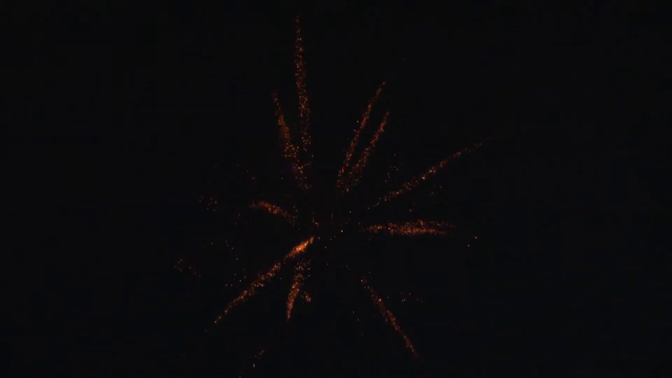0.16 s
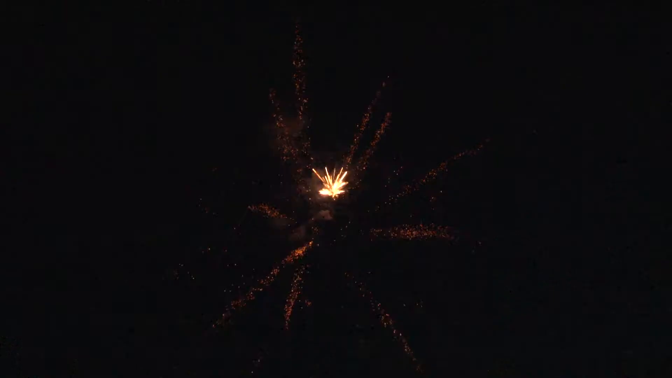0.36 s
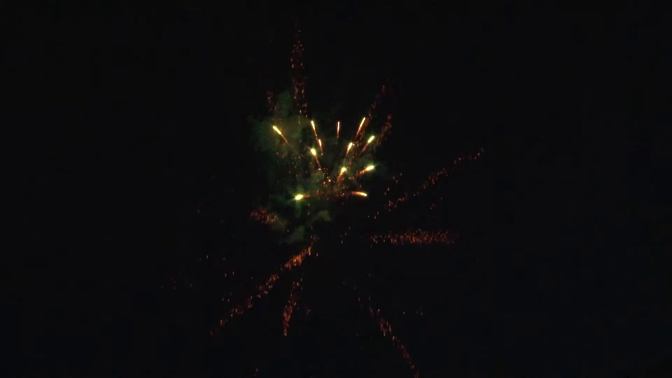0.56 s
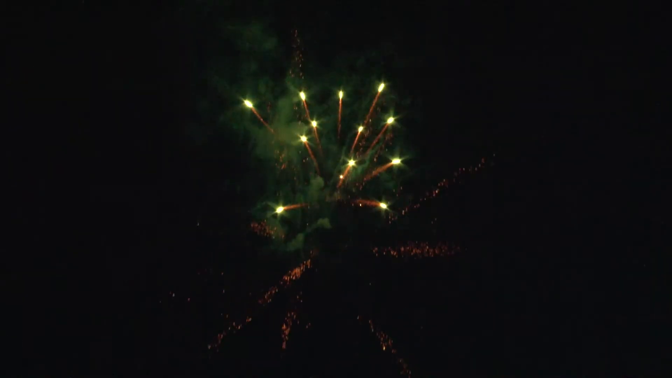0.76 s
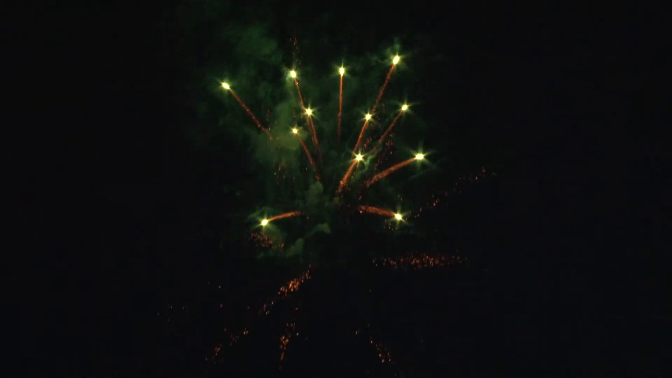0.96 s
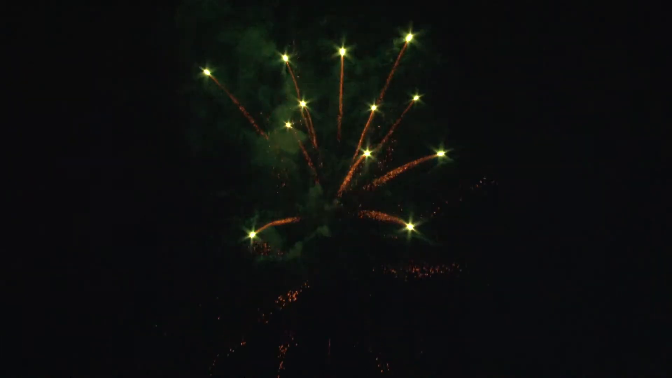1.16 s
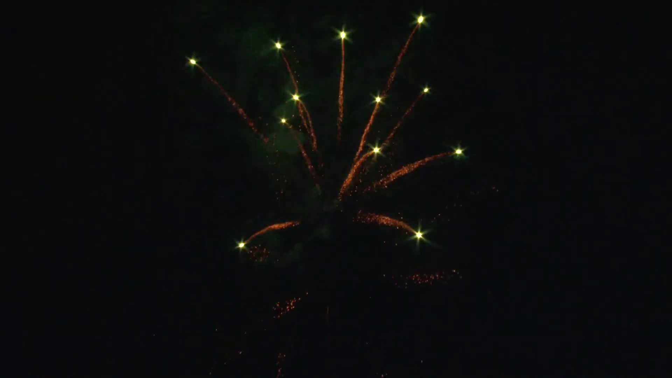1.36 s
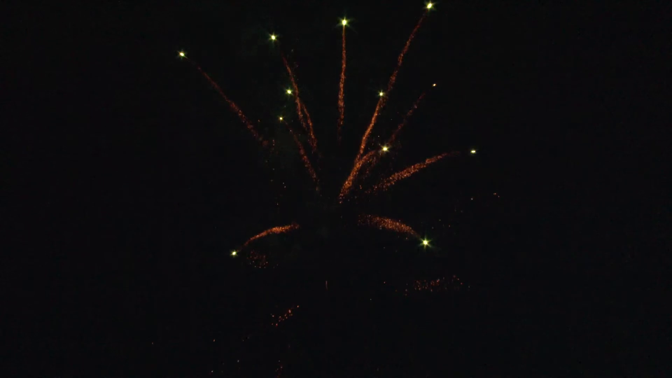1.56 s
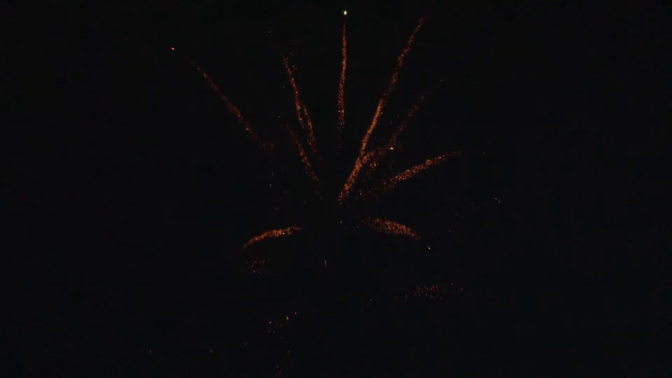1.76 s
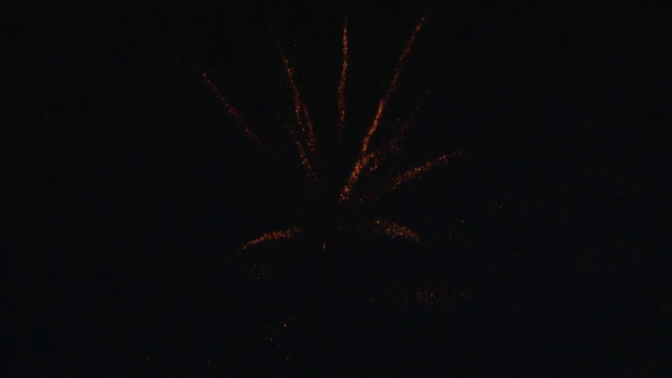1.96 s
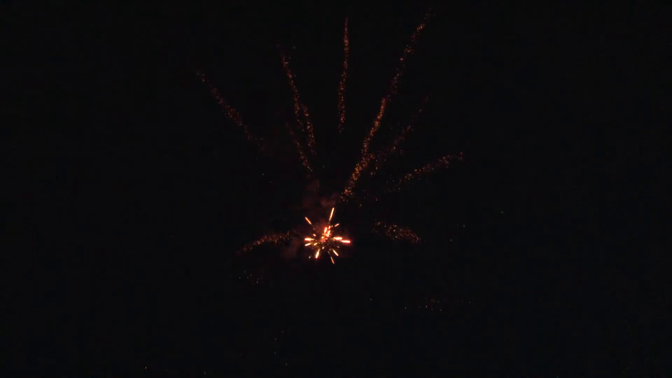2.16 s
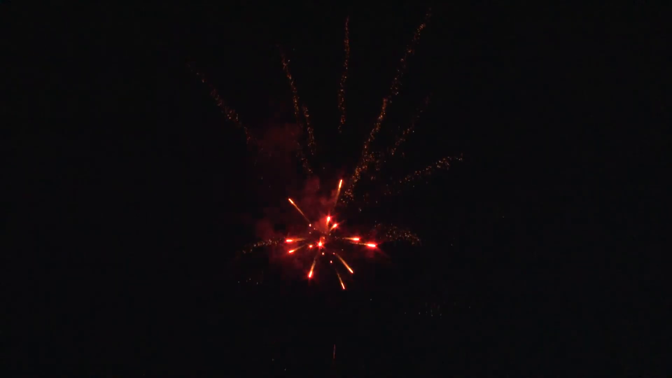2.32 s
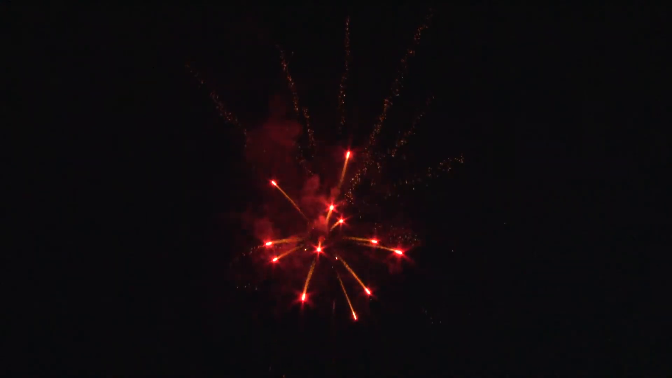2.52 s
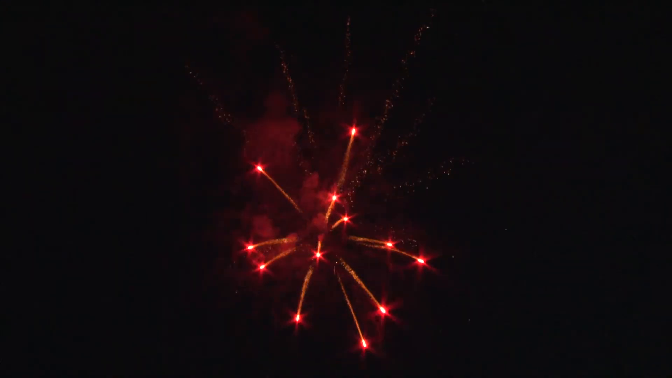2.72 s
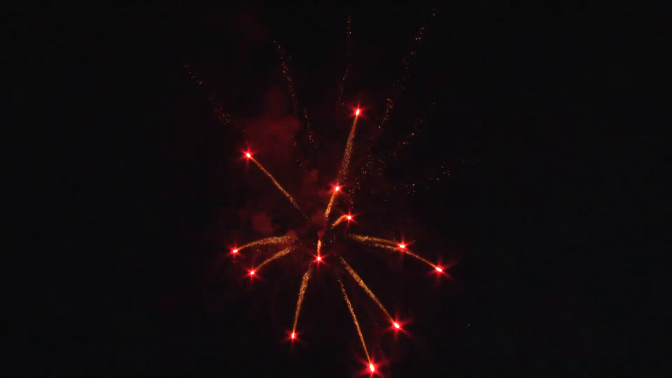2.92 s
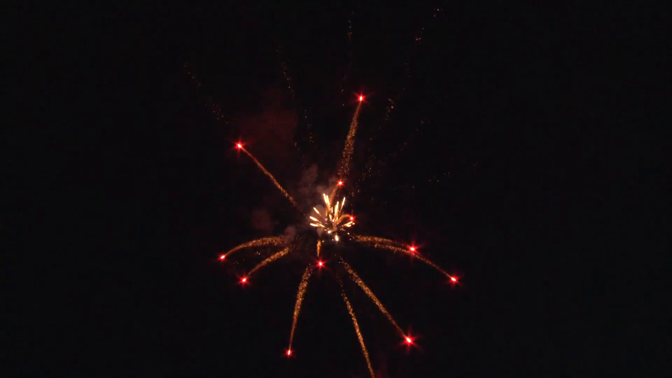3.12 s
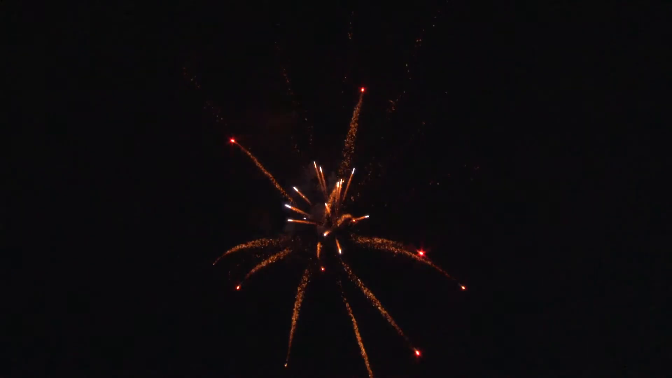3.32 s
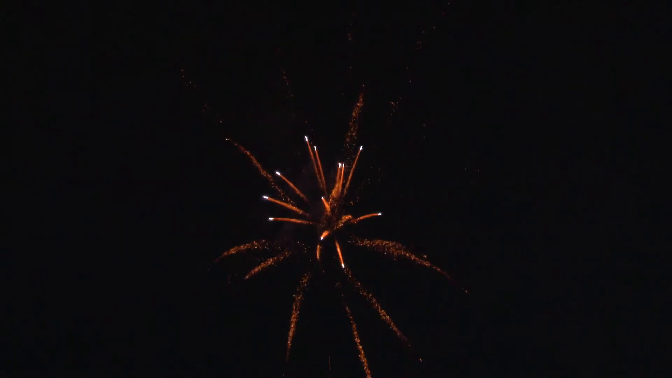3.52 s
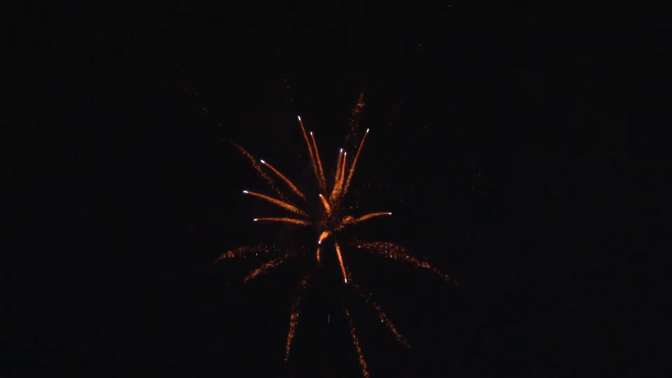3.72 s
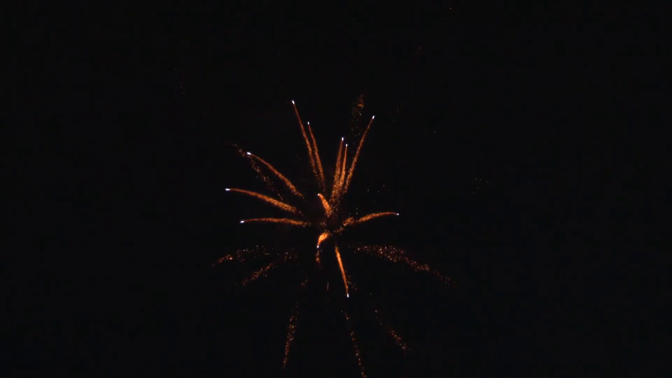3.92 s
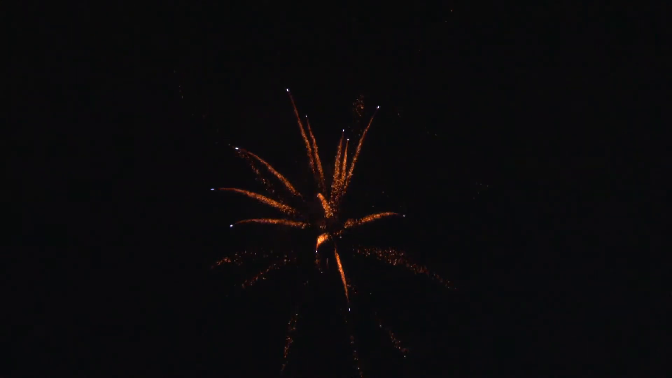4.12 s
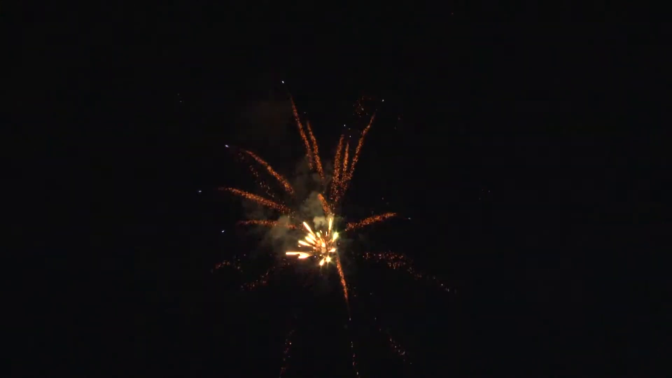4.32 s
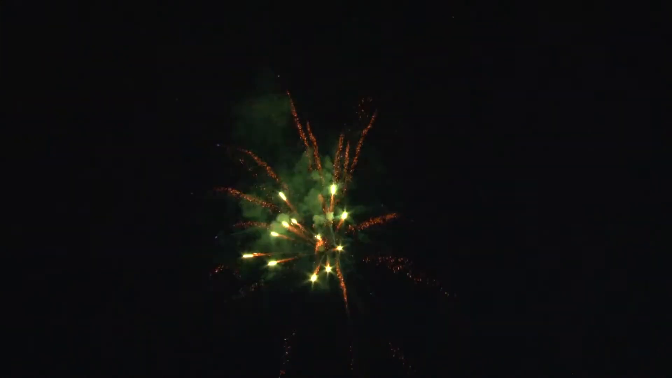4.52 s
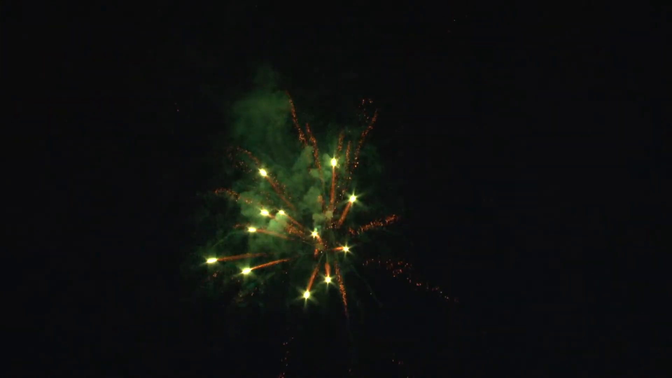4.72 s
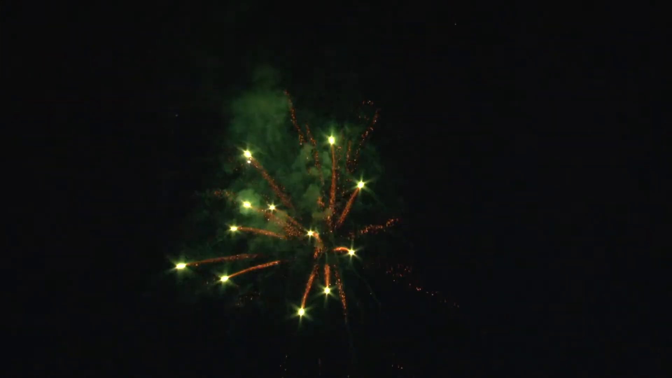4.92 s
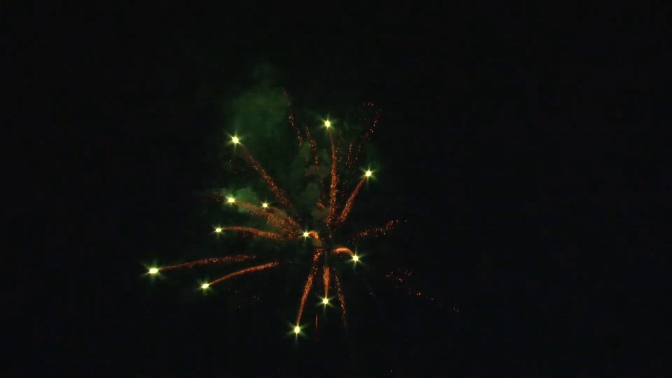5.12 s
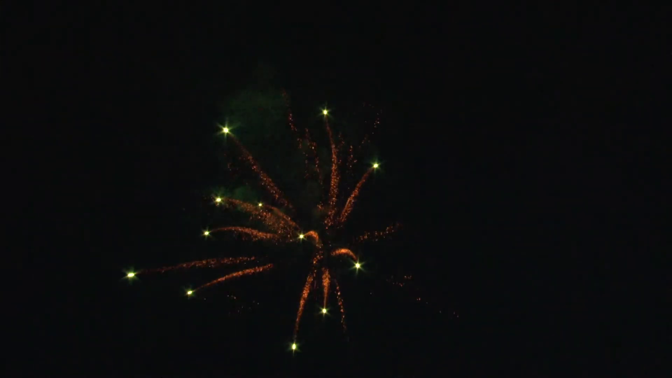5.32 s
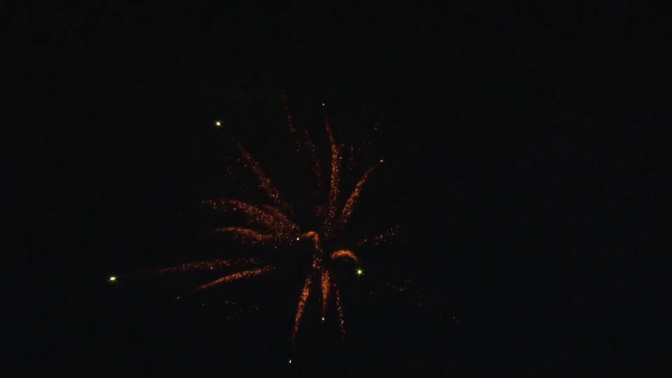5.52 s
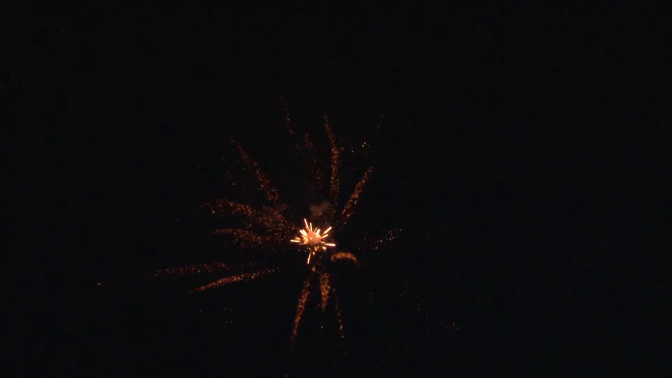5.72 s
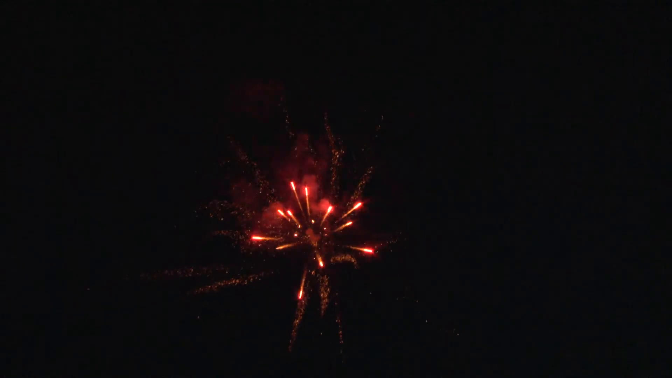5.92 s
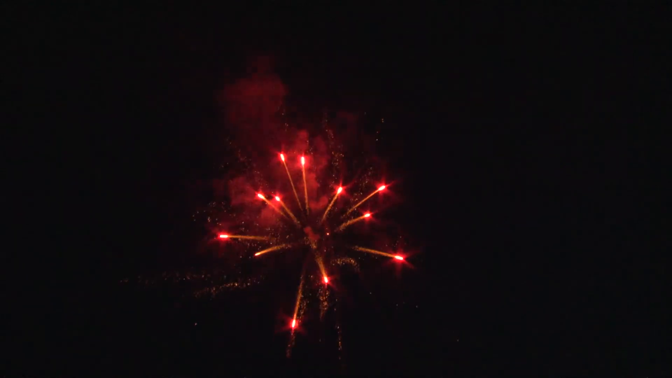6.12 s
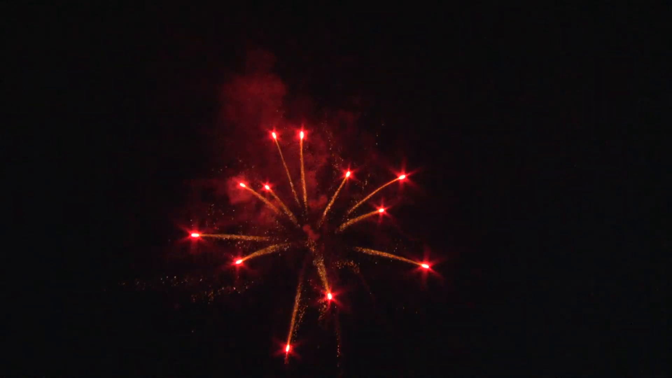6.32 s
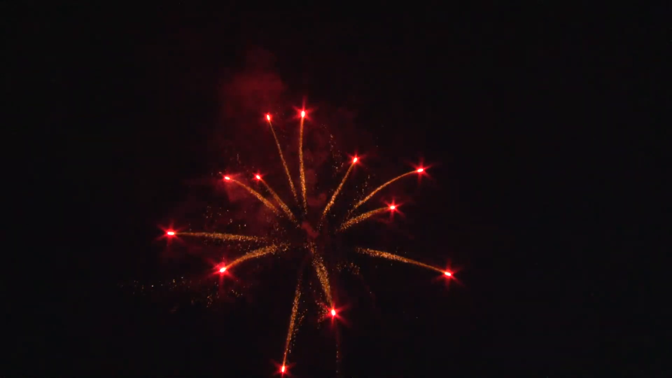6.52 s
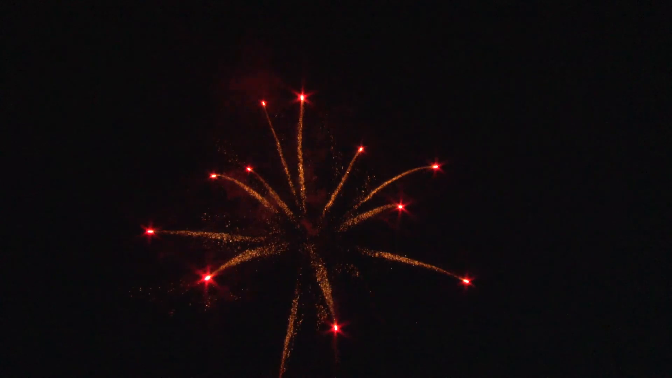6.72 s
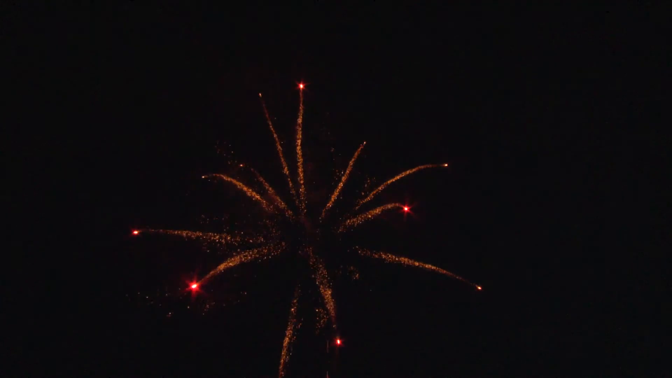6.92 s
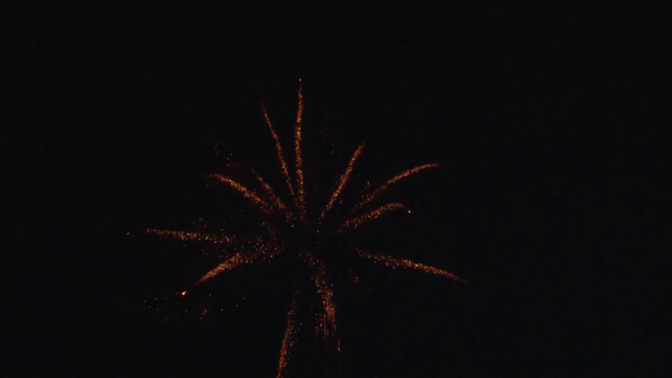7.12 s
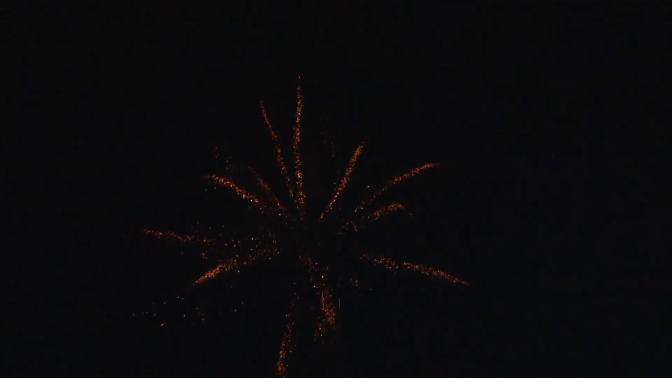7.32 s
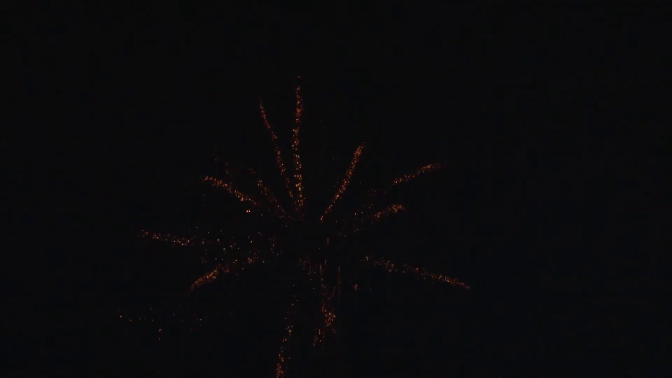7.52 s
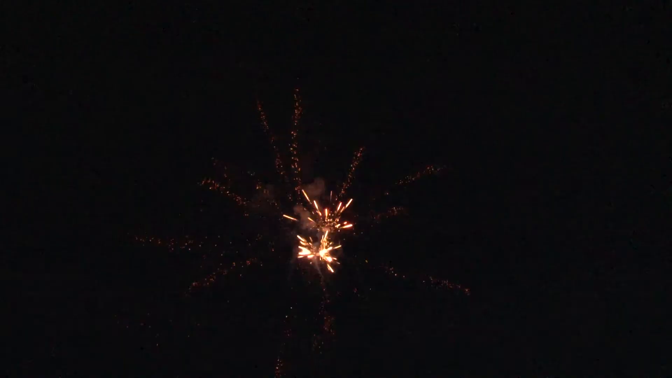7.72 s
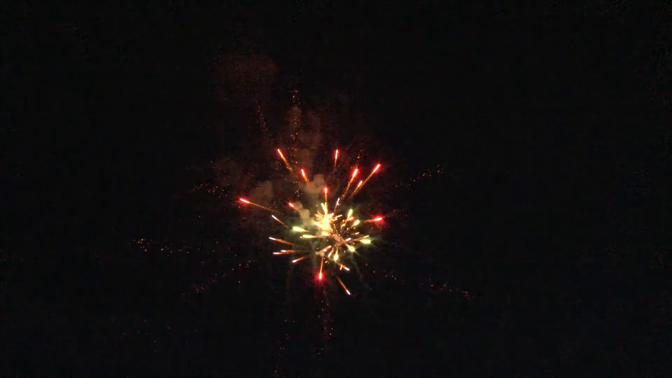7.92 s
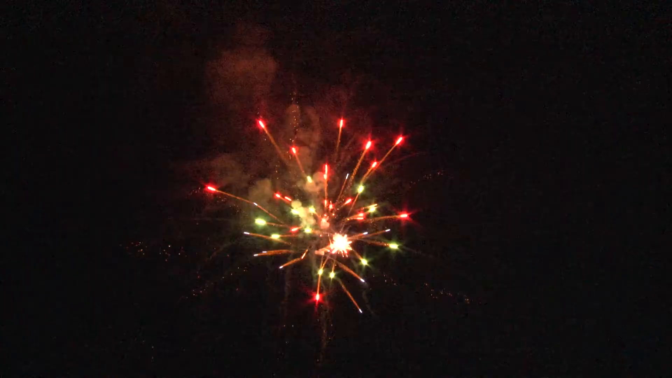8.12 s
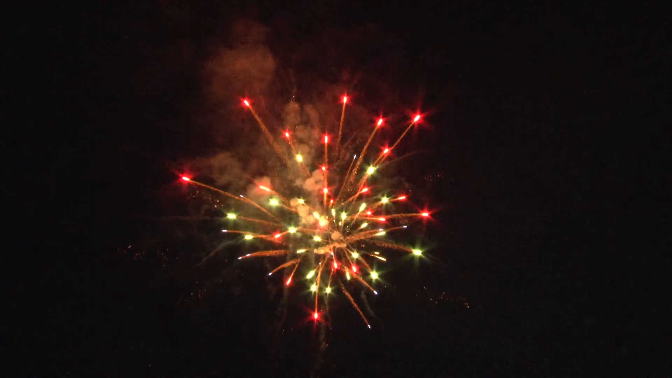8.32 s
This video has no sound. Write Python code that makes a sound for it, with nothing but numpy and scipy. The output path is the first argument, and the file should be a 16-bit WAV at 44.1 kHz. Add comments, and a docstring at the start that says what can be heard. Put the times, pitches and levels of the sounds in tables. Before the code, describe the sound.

Sharp firework bangs go off about a second apart outdoors, each rolling away, then a quick volley of pops leads to a rapid cluster.

```python
"""A faint outdoor hush at night, with the last of a firework's echo rolling away. Heard from a yard,
on a camera microphone: a cake's mortar tubes thump, and the shells burst overhead with hard bangs
that overload it. Each bang comes back off the ground, off a house wall and then as a long roll
from trees and roofs. The stars sizzle as they burn, and small sharp ticks, like falling shell
scraps, sound in between."""
import sys
import numpy as np
from scipy import signal
from scipy.fft import rfft, irfft, next_fast_len
from scipy.io import wavfile
from scipy.ndimage import uniform_filter1d, minimum_filter1d

SR = 44100
rng = np.random.default_rng(int(sys.argv[2]) if len(sys.argv) > 2 else 0)


def to_wav(sig):
    """Store sig (one row per channel, or 1-D mono) as 16-bit WAV at the path in sys.argv[1].

    Samples outside -1..1 are clipped; the rate is SR.
    """
    pcm = np.clip(np.atleast_2d(sig), -1, 1) * 32767
    pcm = np.round(pcm).astype(np.int16)
    wavfile.write(sys.argv[1], SR, pcm.T)  # frames by channels


N = 373086
SHORT, LONG = SR // 5, 2 * SR  # samples in a near sound and in a distant roll


def amp(db):
    """Decibels to gain."""
    return 10 ** (np.asarray(db) / 20)


def unit(x):
    """Scale to rms 1."""
    return x / np.sqrt(np.mean(x ** 2) + 1e-20)


def along(points, hz):
    """Read (Hz, value) points on a log frequency axis."""
    point_hz, values = np.transpose(points)
    return np.interp(np.log(hz + 1), np.log(point_hz + 1), values)


def add(track, s, sound):
    """Mix a sound into a track from time s, which may lie before the start."""
    start = round(s * SR)
    sound = sound[..., max(-start, 0):]
    part = track[..., max(start, 0):][..., :sound.shape[-1]]
    part += sound[..., :part.shape[-1]]


def colour(x, spectrum):
    """Minimum-phase filter through (Hz, dB) points: nothing rings ahead of an attack."""
    size = 2 * next_fast_len(x.shape[-1] // 2 + SR // 20)
    gain = amp(along(spectrum, np.fft.rfftfreq(size, 1 / SR)))
    cepstrum = irfft(np.log(gain + 1e-6))
    cepstrum[1:size // 2] *= 2
    cepstrum[size // 2 + 1:] = 0
    return irfft(rfft(x, size) * np.exp(rfft(cepstrum)), size)[..., :x.shape[-1]]


# Stereo width: the microphone's close ports hear the bass alike.
# Each row: frequency in Hz, side level in dB.
STEREO_WIDTH = [(120, -12.5), (300, -3.5), (1000, 0.5), (2500, -1), (5000, 5), (9000, -10.5)]

def noise(spectrum, size, side_db, grain_db=0):
    """Stereo noise of rms 1; grain lets single spikes stand out."""
    hz = np.fft.rfftfreq(size, 1 / SR)
    white = rng.standard_normal((2, size)) * amp(grain_db * rng.standard_normal(size))
    mid_gain = amp(along(spectrum, hz))
    side_gain = mid_gain * amp(side_db + along(STEREO_WIDTH, hz))
    mid, side = irfft(rfft(white) * [mid_gain, side_gain], size)
    return unit(np.array([mid + side, mid - side]))


def scatter(spectrum, t60, rise, side_db, grain_db=0):
    """A short cluster of reflections that swells and dies; t60 and rise are in seconds."""
    t = np.arange(SHORT) / SR
    envelope = amp(-60 * t / t60) * (1 - np.exp(-t / rise))
    white = noise([(0, 0)], SHORT, side_db, grain_db)
    cluster = colour(white * envelope, spectrum)
    return unit(cluster) * np.sqrt(np.mean(envelope ** 2))


# The night all around, and the camera's own hiss. Each row: frequency in Hz, relative level in dB.
HUSH_SPECTRUM = [(30, -27), (100, -14), (220, -3), (450, -2), (800, -5.5), (1300, -12), (2100, -15),
                 (3200, -20.5), (3800, -27.5), (6300, -27), (8200, -27), (9200, -46), (13000, -47),
                 (16000, -63)]
HISS_SPECTRUM = [(5500, -54), (6700, -6), (7300, -2), (8150, -8), (8700, -18), (10000, -49)]

def hush_and_hiss(hush_db=-56.3, hiss_db=-70.3, buzz_hz=60):
    """The steady outdoor hush and the camera's thin, buzzing hiss."""
    t = np.arange(N) / SR
    hush = noise(HUSH_SPECTRUM, next_fast_len(N), side_db=-8)[:, :N]
    hiss = noise(HISS_SPECTRUM, next_fast_len(N), side_db=-11.5)[:, :N]
    buzz = 1 + .35 * np.sin(2 * np.pi * buzz_hz * t)
    return amp(hush_db) * hush + amp(hiss_db) * hiss * buzz


# How echoes fade in the open air. Each row: frequency in Hz, seconds to fall by 60 dB.
OUTDOOR_DECAY = [(60, 1.3), (200, 0.9), (440, 1.19), (800, 1.19), (1500, 1.1), (3000, 1.07), (6000, 0.79),
                 (9000, 0.69), (14000, 0.49)]

def distant_roll(spectrum, swell_s, far_db, side_db, lumpy_db):
    """Echoes of trees and roofs: they gather until the swell time, then fade in lumps, treble first."""
    hz, t, bands = signal.stft(noise(spectrum, LONG, side_db, grain_db=3), SR, nperseg=256)
    fade_db = -60 * np.maximum(t - swell_s, 0) / along(OUTDOOR_DECAY, hz)[:, None]
    far_echoes = amp(far_db + 0.38 * fade_db)  # these linger
    gain = np.minimum(t / swell_s, 1) ** 2 * np.hypot(amp(fade_db), far_echoes)
    lumps = unit(uniform_filter1d(rng.standard_normal(len(t)), size=5))
    return signal.istft(bands * gain * amp(lumpy_db * lumps), SR, nperseg=256)[1]


def blast_wave(push_s, low_hz):
    """A sudden push of air and a longer suction, without the deepest bass."""
    age = np.arange(SHORT) / SR / push_s
    pressure = (1 - age) * np.exp(-age)
    return signal.sosfilt(signal.butter(2, low_hz, "high", fs=SR, output="sos"), pressure)


# Shells overhead, the first already rolling away at the start. Each row: start in seconds,
# relative blast level in dB, relative echo level in dB, house wall delay in seconds.
SHELLS = [(-1.12, 0, 0, .043), (0.6309, 4.5, -.2, .046), (2.3652, 2, -.2, .042), (3.2797, -1, -1.6, .042),
          (4.4918, 2, 0, .042), (5.9522, 1.5, .2, .042), (7.9070, 1.5, -1, .037),
          (7.9410, -5.5, -8.5, .043), (8.0627, .5, -1, .046), (8.179, -1, -.3, .048),
          (8.4024, 2.5, 1, .046)]
# Hard surfaces near the microphone. Each row: delay in seconds, level in dB.
NEAR_SURFACES = [(.0019, -8), (.0029, -18), (0.013, -25.5), (0.0273, -23.5)]
# What the blast sets ringing close by. Each row: pitch in Hz, level in dB, seconds to fall by 60 dB.
RATTLE_MODES = [(295, -16, 0.084), (506.4, -9.5, 0.084), (620, -15, 0.092), (1105, -12, 0.04),
                (1490, -14, 0.029), (3280, -35, 0.02)]
# The tone of each path to the microphone. Each row: frequency in Hz, relative level in dB.
FLIGHT_FILTER = [(40, -34), (120, -11.5), (220, 1.5), (330, 1), (700, -4.5), (1150, -1.5), (3000, -5.5),
                 (7000, -1), (11000, -2), (13000, -3.5), (16000, -25)]  # what is left of the blast after its flight
BOUNCE_FILTER = [(2000, 0), (5000, 7), (9000, -10), (14000, -2)]  # rough surfaces return less of the top treble
CRACK_SPECTRUM = [(29, -49), (50, -41.5), (461, 2.5), (586, -3), (1330, -15.5), (2060, -14), (3410, -16),
                  (3850, -19), (4560, -23.5), (5670, -23), (6870, -23.5), (12600, -44), (16000, -57)]  # the scatter right behind the blast
ECHO_SPECTRUM = [(21, -65), (35, -44), (76, -18.5), (151, -7.5), (227, -0.5), (490, -0.5), (684, -8),
                 (1110, -7.5), (3100, -15.5), (3710, -21), (6870, -21.5), (12400, -40), (14800, -56),
                 (16000, -90)]  # house wall, trees and roofs
SNAP_SPECTRUM = [(300, -17), (1200, -11), (2200, -1), (3200, -5.5), (5500, -10), (8000, -14), (12000, -40),
                 (16000, -42)]  # the bright slap off the eaves; the ticks share it

def shell_bursts(wall_db=-10.8, eaves_db=-23.5, roll_db=-18.8):
    """Each shell's shock arrives, bounces near the microphone, slaps off the house and rolls away."""
    out, t = np.zeros((2, N)), np.arange(SHORT) / SR
    ground_delay_s, ground_db, eaves_delay_s = .0045, -1, .0125
    for s, db, echo_db, wall_delay_s in SHELLS:
        blast = blast_wave(push_s=0.00062 * amp(rng.normal(0, .6)), low_hz=199)
        direct = amp(db + 8) * colour(blast, FLIGHT_FILTER)
        bounces = [(delay, amp(level) * colour(direct, BOUNCE_FILTER)) for delay, level in NEAR_SURFACES]
        for delay, sound in [(0.00014, direct)] + bounces:  # each comes straight and off the ground
            arrival = s + delay * (1 + rng.normal(0, 0.017))
            add(out, arrival, sound)
            add(out, arrival + ground_delay_s, amp(ground_db) * sound)
        rattle = sum(amp(level + rng.normal(0, 0.49) - 60 * t / t60) * np.cos(2 * np.pi * hz * t)
                     for hz, level, t60 in RATTLE_MODES)
        add(out, s, amp(db - 3) * rattle * (1 - np.exp(-t / 0.0014)))
        crack = scatter(CRACK_SPECTRUM, t60=0.094, rise=.0006, side_db=-9, grain_db=7.5)
        add(out, s, amp(db - 9.5) * crack)
        wall = scatter(ECHO_SPECTRUM, t60=0.095, rise=0.003, side_db=-11.5, grain_db=7)
        add(out, s + wall_delay_s, amp(echo_db + wall_db) * wall)
        eaves = scatter(SNAP_SPECTRUM, t60=0.0073, rise=.0002, side_db=-4)
        add(out, s + wall_delay_s + eaves_delay_s, amp(echo_db + eaves_db) * eaves)
        roll = distant_roll(ECHO_SPECTRUM, swell_s=.092, far_db=-14, side_db=-8.5, lumpy_db=0.84)
        add(out, s, amp(echo_db + roll_db) * roll)
    return out


# Burning stars, heard from the ground. Each row: frequency in Hz, relative level in dB.
SIZZLE_SPECTRUM = [(300, -20), (1000, -3), (2200, 0), (3200, -4), (4500, -12), (8000, -20), (13000, -45)]

def burning_stars(level_db=-59.5, burn_s=1.05, fade_s=.2):
    """The stars of every shell sizzle faintly for the same time, then go out."""
    t = np.arange(N) / SR
    power = sum(np.clip((s + burn_s - t) / fade_s + 1, 0, 1) * (t > s) for s, *_ in SHELLS)
    sizzle = noise(SIZZLE_SPECTRUM, next_fast_len(N), side_db=-9, grain_db=6)[:, :N]
    return amp(level_db) * np.sqrt(power) * sizzle


# The ticks that reach the microphone most clearly. Each row: start in seconds, level in dB,
# relative scatter level in dB, brightness in dB per octave.
CLEAR_TICKS = [(.3115, -24.5, -9.5, -.5), (0.399, -41.5, 0, -2), (1.145, -36.5, 7.5, 3.5),
               (1.6411, -41.5, 4.5, -3), (2.2220, -26, -1.5, -.5), (2.798, -36, 0, 1),
               (4.0433, -34.5, 2, -2), (5.727, -36, -7.5, 0), (7.0862, -38, 1.5, 1.5),
               (7.5286, -22.5, -10, 0)]

def ticks(faint_count=4, faint_db=-47, pivot_hz=3000):
    """Dry, bright snaps with a short scatter and a faint echo; a few weaker ones fall at random."""
    out = np.zeros((2, N))
    faint_ticks = [(rng.uniform(0, N / SR), rng.normal(faint_db, 2), -3, 2) for _ in range(faint_count)]
    for s, db, scatter_db, brightness in CLEAR_TICKS + faint_ticks:
        spectrum = [(hz, level + brightness * np.log2(hz / pivot_hz)) for hz, level in SNAP_SPECTRUM]
        snap = scatter(spectrum, t60=0.0048, rise=.0001, side_db=-9)
        add(out, s, amp(db) * snap)
        reflections = scatter(spectrum, t60=0.07, rise=0.003, side_db=-9, grain_db=9)
        add(out, s, amp(db + scatter_db - 1.5) * reflections)
        echo = scatter(spectrum, t60=0.64, rise=0.0053, side_db=-9, grain_db=8)
        add(out, s + 0.048, amp(db - 31) * echo)
    return out


# Lift charges in the tubes: two single shots, then a quick volley.
# Each row: start in seconds, relative level in dB, muzzle ring level in dB.
LIFT_CHARGES = [(1.9050, 1, -32), (3.1444, 2, -30), (6.5009, -0.5, -16.5), (6.5640, -1, -18),
                (6.5971, -1.5, -16), (6.629, -1, -18), (6.6615, -.5, -22)]
# Yard walls that answer the tubes. Each row: delay in seconds, relative level in dB.
YARD_WALLS = [(.025, -7), (.032, 0), (0.0416, -5.5)]
# The puff at the tube and its roll from afar. Each row: frequency in Hz, relative level in dB.
PUFF_SPECTRUM = [(29, -47), (50, -21), (175, 0.5), (483, -7.5), (950, -0.5), (1910, -4), (2160, -16),
                 (2380, -4), (3760, -17.5), (4350, -16.5), (6240, -15.5), (11700, -29), (16000, -63)]
LIFT_ROLL_SPECTRUM = [(29, -48), (50, -15.5), (279, 2), (460, -3.5), (1790, -6), (3100, -9.5), (3760, -16),
                      (6990, -16), (11800, -35), (15000, -62)]

def mortar_tubes(tube_hz=174, tube_t60=.085, muzzle_hz=2490, muzzle_t60=.018):
    """A lift charge cracks, the muzzle rings, the tube hums at its pipe pitch, and the yard answers."""
    out, t = np.zeros((2, N)), np.arange(SHORT) / SR
    hum = np.sin(2 * np.pi * tube_hz * t) * amp(-60 * t / tube_t60) * (1 - np.exp(-t / .002))
    for s, db, ring_db in LIFT_CHARGES:
        ring_hz = rng.normal(muzzle_hz, 70)  # the tubes ring nearly alike
        ring = amp(ring_db) * np.sin(2 * np.pi * ring_hz * t) * amp(-60 * t / muzzle_t60)
        pop = amp(db - 18.5) * blast_wave(push_s=0.00027, low_hz=300) + amp(db) * ring
        add(out, s, pop + amp(db - 21) * hum)
        puff = scatter(PUFF_SPECTRUM, t60=.025, rise=0.00021, side_db=-16)
        add(out, s, amp(db - 21) * puff)
        puff_tail = scatter(PUFF_SPECTRUM, t60=0.19, rise=0.012, side_db=-9.5, grain_db=3)
        add(out, s, amp(db - 24.5) * puff_tail)
        for delay, echo_db in YARD_WALLS:
            slap = scatter(PUFF_SPECTRUM, t60=0.022, rise=.0005, side_db=-10, grain_db=2)
            add(out, s + delay, amp(db + echo_db - 17) * slap + amp(echo_db - 8.5) * pop)
        roll = distant_roll(LIFT_ROLL_SPECTRUM, swell_s=0.05, far_db=-13, side_db=-8, lumpy_db=1)
        add(out, s, amp(db - 34) * roll)
    return out


def scene():
    """Everything that reaches the microphone in the yard."""
    return shell_bursts() + burning_stars() + mortar_tubes() + ticks() + hush_and_hiss()


# The camera microphone's response. Each row: frequency in Hz, gain in dB.
MIC_RESPONSE = [(100, -4), (380, -0.5), (500, -0.5), (640, 1), (800, 0), (1120, 3), (1350, 1.5), (2600, 1),
                (3250, 3), (3700, -3), (4500, 3), (5400, -2.5)]

def record(dry):
    """The microphone colours the sound, a fast limiter squashes the bangs, and bass and top are cut."""
    limit, ceiling, hardness = 1.81, .93, 6
    bass_hz, top_hz = 80, 16900
    x = colour(dry, MIC_RESPONSE)
    needed_gain = np.minimum(1, limit / (np.abs(x).max(axis=0) + 1e-9))
    x = x * uniform_filter1d(minimum_filter1d(needed_gain, size=221), size=221)  # 5 ms hold and ramp
    x = x / (1 + np.abs(x / ceiling) ** hardness) ** (1 / hardness)  # the overload rounds off the peaks
    x = signal.sosfilt(signal.butter(2, bass_hz, "high", fs=SR, output="sos"), x)
    return signal.sosfilt(signal.cheby2(12, 80, top_hz, fs=SR, output="sos"), x)


dry = scene()
out = record(dry)
to_wav(out)
```